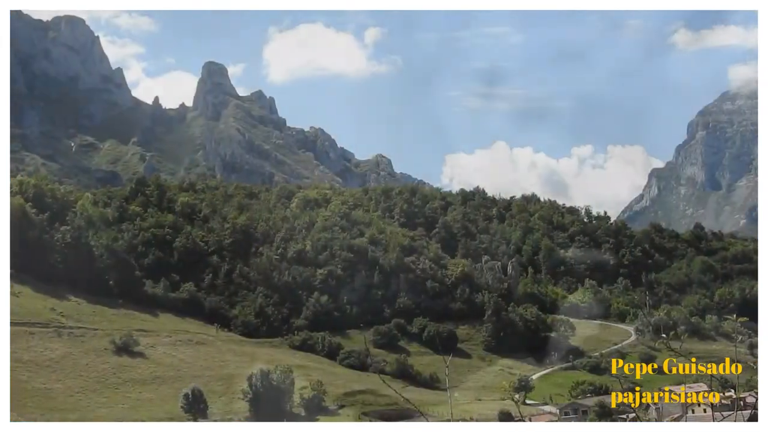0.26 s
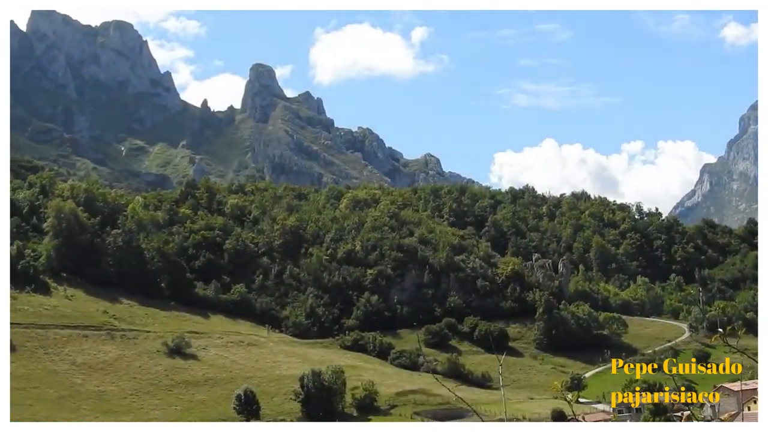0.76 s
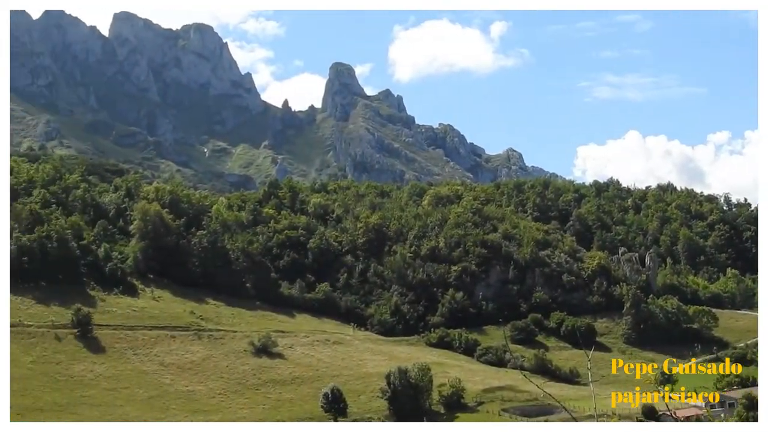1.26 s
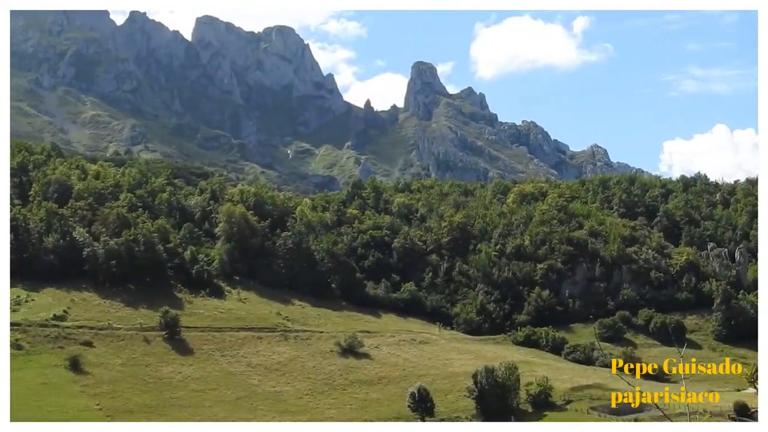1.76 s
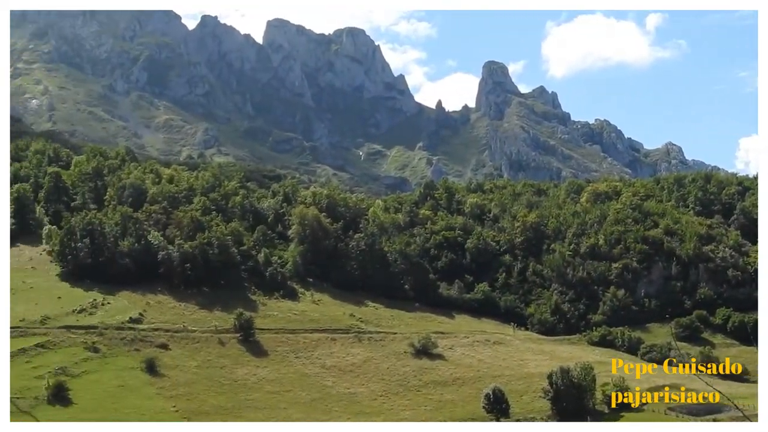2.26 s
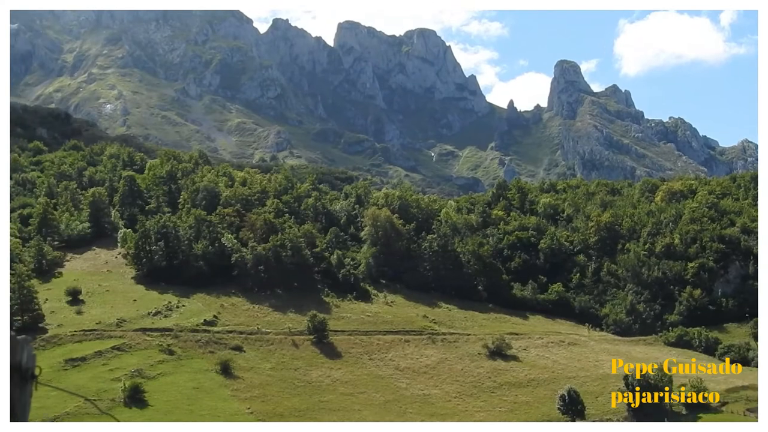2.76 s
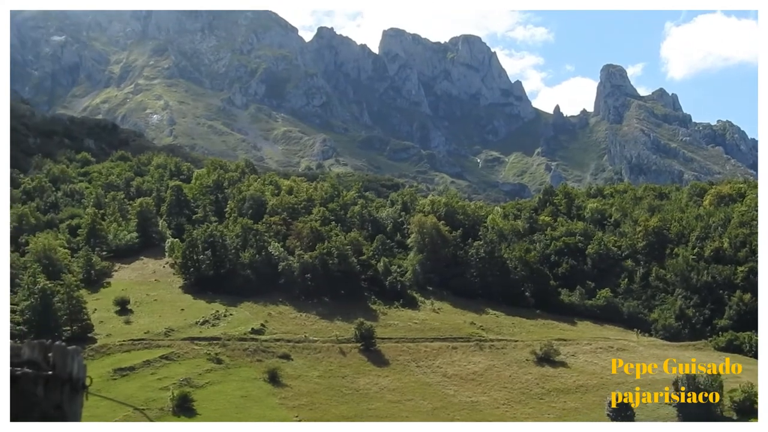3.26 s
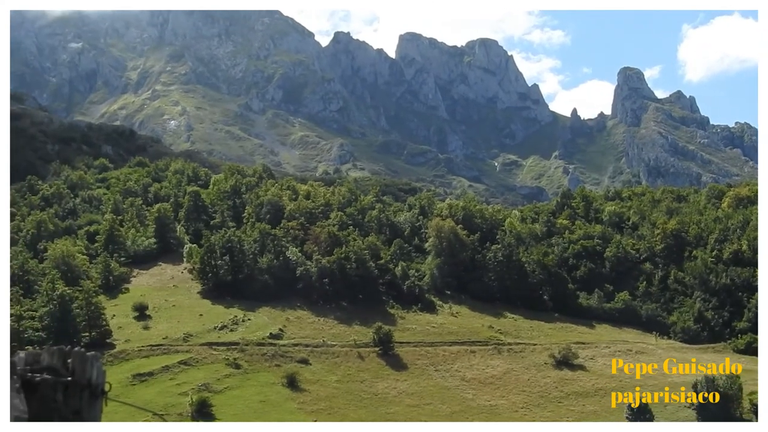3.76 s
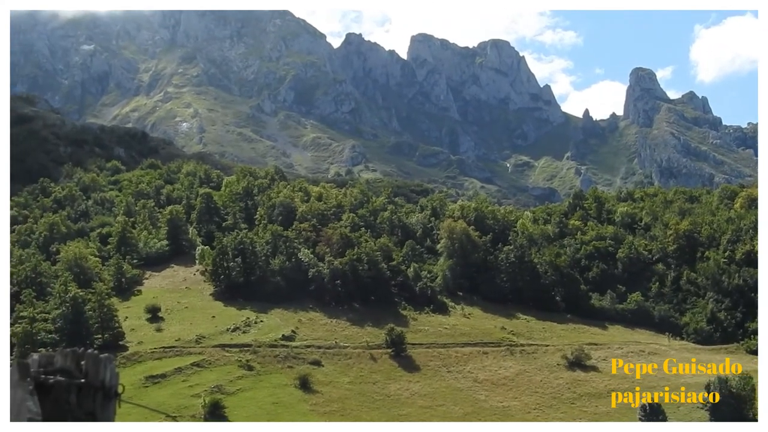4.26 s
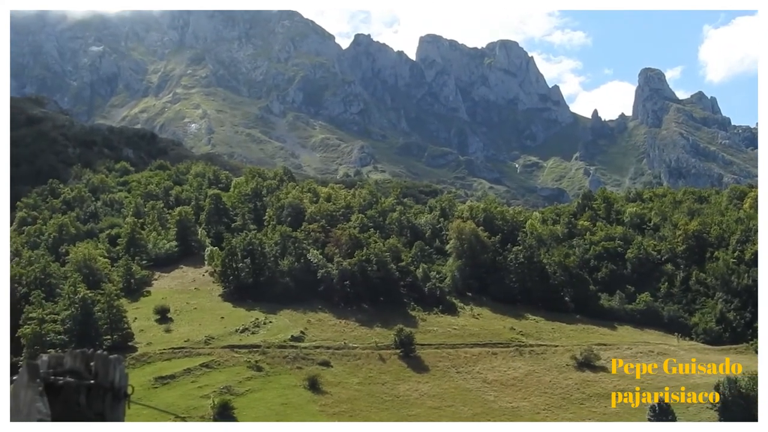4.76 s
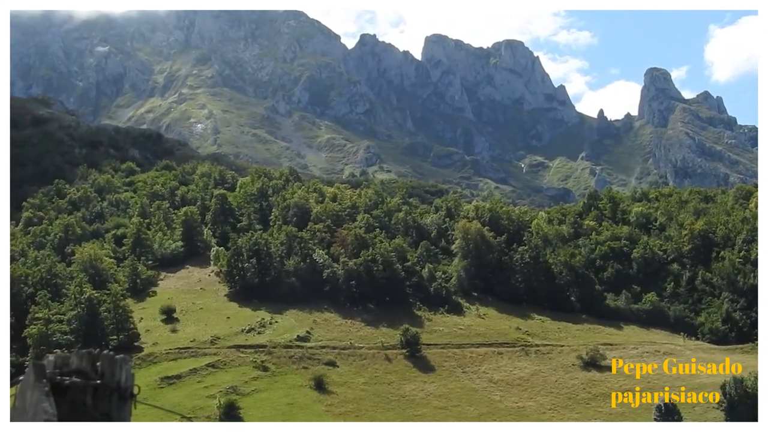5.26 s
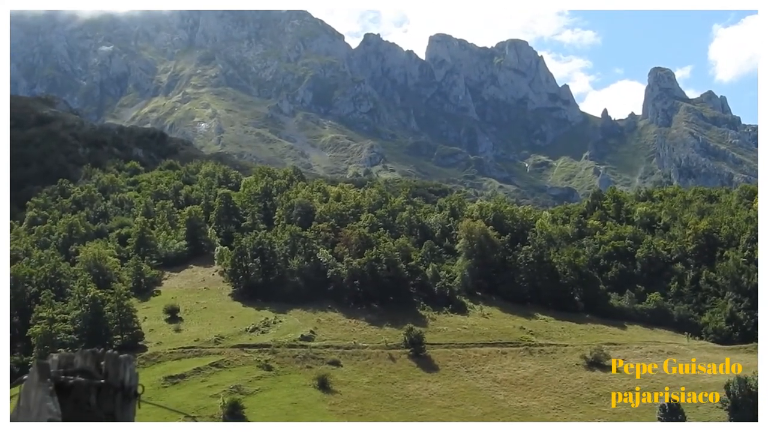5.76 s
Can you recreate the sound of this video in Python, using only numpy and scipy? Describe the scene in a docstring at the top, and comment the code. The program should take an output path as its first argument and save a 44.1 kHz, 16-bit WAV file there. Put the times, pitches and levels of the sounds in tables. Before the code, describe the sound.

A wooded hillside in a gusty breeze, heard in stereo for six seconds. Leaves hush softly with a faint distant rush. From 0.1 to 0.8 s a close small bird gives four short, hoarse rasping calls; from 1.1 to 2.3 s it sings ten sharp chirps, about eight a second, each a noisy rasp snapping into a brief arched tone near 2.5 to 3.5 kHz. Deep wind thumps, flutters and pops strongly around 0.5 to 1 s, shifting between sides, with another gust near 2.1 s. Between 2.4 and 3.9 s come thin falling whistles and hoarse calls from afar, in calmer air. At 3.9 s a dry tick precedes a nuthatch's thirteen gliding, nearly pure whistles around 2.2 kHz, six a second, ringing in scattered tree echoes until 6 s. The background rush drops at 4.1 s, a far bird chorus swells, and gusts return after 4.9 s.

```python
"""A wooded hillside in a gusty breeze. A small bird gives four rasping calls and a run of ten sharp chirps,
made of noisy rasps that lock into arched tones; then a nuthatch whistles a fast trill of gliding, nearly
pure notes that rings in scattered echoes among the trees. Thin slurs and hoarse calls come from farther off.
Shaped noise makes the leaves, a distant rush and the far chorus, and wind that buffets and pops on each
side of the microphone on its own."""
import sys
import numpy as np
from scipy import signal
from scipy.fft import rfft, irfft
from scipy.io import wavfile
from scipy.ndimage import uniform_filter1d

SR = 44100
rng = np.random.default_rng(int(sys.argv[2]) if len(sys.argv) > 2 else 0)


def master(y):
    """Save y as 16-bit WAV."""
    cut = np.clip(np.atleast_2d(y).T, -1, 1)
    pcm = np.round(cut * 32767)  # scale
    wavfile.write(sys.argv[1], SR, pcm.astype(np.int16))


N = 265702
TIME = np.arange(N) / SR

# Small bird's chirps: (tone onset [s], tone length [s], arch height [Hz], rasp swell time [s],
# relative overtone level [dB])
CHIRPS = [(0.071, 0.015, -4, 0.024, -30), (0.305, 0.016, -3, 0.02, -34.5), (0.527, 0.028, 4, 0.021, -19.5),
          (.791, 0.026, 5, 0.017, -26.5), (1.144, 0.035, 63, 0.012, -21.5),
          (1.272, 0.035, 475, 0.0068, -23.5), (1.392, .037, 480, 0.0065, -25),
          (1.516, 0.038, 433, 0.007, -24.5), (1.647, .039, 516, 0.0074, -25),
          (1.773, 0.039, 788, .007, -26), (1.901, 0.04, 789, 0.0078, -27.5),
          (2.028, 0.041, 936, 0.0068, -25.5), (2.167, 0.04, 943, 0.0097, -27.5),
          (2.316, 0.041, 921, 0.0056, -26)]
# What throat and beak pass of the first voice: (frequency [Hz], level [dB])
LOW_BEAK = [(600, -24), (1500, 17), (2000, 6), (2600, 2), (3100, 3), (3700, -18), (4200, -9), (4800, -35)]
# What throat and beak pass of the second voice: (frequency [Hz], level [dB])
HIGH_BEAK = [(3200, -39), (4000, 2.5), (4700, -14.5), (5300, 3), (6100, 1), (6800, 3), (7600, -11.5),
             (8200, -12), (9000, -53)]
# Top end of the small bird's whole voice: (frequency [Hz], level [dB])
BEAK_TOP = [(7800, -0.5), (8600, -11), (10500, -29)]
# Colour of the rasp: (frequency [Hz], level [dB])
RASP = [(500, -11.5), (900, -11.5), (1600, -10), (2700, -9), (3700, 0.5), (4200, -43), (4700, -54)]
CHIRP_HZ, CREST_S, DROOP_S = 2574, 0.0095, 0.054  # pitch crests early, then droops ever faster
ARCH_AT, ARCH_WIDTH = 0.51, 0.21  # an arch lifts the middle as the bird warms up (shares of the tone)
FULL_S, FULL_DB, SHORT_DB_PER_S = 0.04, -24, 488  # tones shorter than full length are weaker
# Tones shorter than HOARSE_S turn hoarse and flat
HOARSE_S, HOARSE_ROUGH, HOARSE_SAG, CLEAR_ROUGH = 0.0305, 0.46, 0.1, 0.13
SECOND_VOICE_LAG_S = 0.0095
RASP_DB, RASP_DB_PER_HZ = -28, -0.0065  # the higher the arch, the less rasp
# A rough buzz inside the rasp climbs toward the tone
SQUEAK_FROM_HZ, SQUEAK_TO_HZ, SQUEAK_DB, SQUEAK_ROUGH = 650, 1904, -4.5, 0.048

# Nuthatch's notes: (onset [s], top pitch [Hz], relative level [dB])
WHISTLES = [(3.934, 2246, -22.5), (4.13, 2284, -22), (4.305, 2289, -21), (4.474, 2261, -21),
            (4.642, 2282, -19), (4.815, 2251, -20.5), (4.99, 2258, -19), (5.15, 2234, -20.5),
            (5.323, 2243, -18.5), (5.484, 2198, -20), (5.647, 2228, -18.5), (5.807, 2218, -19.5),
            (5.966, 2177, -20)]
# Second harmonic of the whistle: (time [s], level [dB])
SECOND_DB = [(3.93, -24), (4.3, -24.5), (4.7, -17.5), (5.05, -21), (5.3, -25), (6.0, -19.5)]
# Breathy edge of a whistle: (frequency [Hz], level [dB])
HUSK = [(1000, -17), (1400, -4), (2400, -21), (3000, 2), (3800, -13.5), (4600, -5), (5500, -41)]
NOTE_S, FIRST_EXTRA_S, SETTLE_S = 0.113, 0.051, 0.22  # first note is drawn out, then the trill settles
RISE_FIRST, RISE_LAST = 0.38, 0.88  # share of a note spent climbing grows through the trill
FACING_DB, TURN_DB_PER_S = 1.5, -2.5  # the bird turns away from the microphone as it sings

SNAP_S, SNAP_DB = 3.931, -22.5  # one sharp tick just before the trill
# Colour of the tick: (frequency [Hz], level [dB])
SNAP = [(2500, -18), (4000, -22), (5200, 0), (7000, -3.5), (9500, -11), (12000, -41)]

# Thin distant whistles: (onset [s], length [s], start pitch [Hz], end pitch [Hz], relative level [dB])
SLURS = [(0.177, .15, 7860, 7300, -52.5), (0.368, .14, 7760, 6760, -52), (0.593, .095, 6940, 6500, -52),
         (2.461, .05, 7270, 6400, -42), (2.585, .079, 7380, 5900, -36.5), (2.733, .07, 6860, 5620, -39),
         (2.758, 0.016, 3870, 5800, -43), (2.791, 0.0165, 3530, 5230, -48),
         (2.873, .083, 6400, 4740, -44.5), (3.674, .065, 7080, 6230, -44), (3.812, .07, 6730, 5860, -45.5),
         (5.479, 0.17, 3110, 3100, -45), (5.648, .18, 3060, 3100, -48.5)]
# Runs of short hoarse distant calls: (start [s], end [s], spacing [s], call length [s], centre [Hz],
# width [Hz], relative level [dB])
FAR_RUNS = [(0.181, .22, .2, 0.018, 6200, 500, -44), (3.291, 3.6, 0.2, .028, 6000, 530, -42),
            (3.62, 3.7, .2, .048, 5430, 1310, -40.5), (3.669, 3.91, 0.049, 0.052, 4700, 1210, -47),
            (4.576, 5.05, .202, 0.037, 5910, 630, -42.5), (5.49, 6.0, 0.2, 0.23, 5820, 420, -49.5)]

# What the trees throw back: (frequency [Hz], level [dB])
ECHO = [(1000, 1.5), (1850, 5), (2100, -2.5), (2270, 3), (2600, -7), (4200, 3.5), (5300, -2.5), (7000, 6),
        (9000, -9)]
# Birds as heard on the left side: (frequency [Hz], level [dB])
SHADE = [(1000, -6.5), (2200, -14), (3000, -12), (3900, -3.5), (5000, -5), (6000, -2), (7500, -4)]
LEFT_LAG_S = 0.000053

# Breeze on the left side: (time [s], relative strength [dB])
BREEZE_LEFT = [(0, -44), (0.44, -44), (0.5, -12.5), (0.72, -10), (0.88, -29), (1.46, -46), (1.76, -45.5),
               (3.99, -48), (4.09, -33), (4.77, -54.5), (4.94, -21), (5.46, -13.5), (5.49, -21),
               (6.02, -26)]
# Breeze on the right side: (time [s], relative strength [dB])
BREEZE_RIGHT = [(0, -28), (.42, -45), (.52, -23), (.95, -13), (1.2, -17), (1.51, -21), (2.06, -26),
                (2.21, -14), (2.26, -20.5), (2.78, -27), (2.81, -37), (3.29, -42), (3.619, -30.5),
                (3.95, -37.5), (4.06, -22.5), (4.77, -24), (5.12, -21), (6.02, -18)]
# Single gusts on top: (peak time [s], length [s], relative strength [dB], left minus right [dB])
GUSTS = [(0.181, 0.06, -13, -13), (0.207, 0.16, -16.5, 29), (0.608, 0.18, -12, -23),
         (0.822, 0.11, -13, -26), (1.398, 0.15, -16, -8), (2.13, 0.093, -13.5, -16),
         (3.056, 0.051, -28, -29), (3.172, 0.043, -27, -27), (3.559, 0.049, -17, -29),
         (4.041, 0.097, -14, -22.5), (4.48, 0.14, -20.5, -4), (4.582, 0.033, -19, 16),
         (4.959, 0.059, -12.5, 22.5), (5.2, 0.12, -11, -7.5), (5.373, 0.17, -14, -7.5),
         (5.823, 0.097, -15, 19), (5.923, 0.032, -13, 21)]
BREEZE_DB, GUST_DB = -0.5, -0.5  # trims on the tables above
SWING_DB, SWING_HZ = 2, 36  # depth and rate of the breeze's chance swings
# Main eddies on the microphone: (frequency [Hz], level [dB])
WIND = [(15, -35.5), (30, -26), (50, -9.5), (70, 2), (115, 5), (150, -6), (200, -11), (260, -41),
        (400, -57.5), (900, -55), (3000, -100)]
# Slow, large eddies: (frequency [Hz], level [dB])
RUMBLE = [(15, -22.5), (35, -9), (70, 3.5), (110, -0.5), (160, -13.5), (240, -33), (500, -67)]
RUMBLE_DB = -51.5
# Thump of stronger wind: (frequency [Hz], level [dB])
BUFFET = [(90, -22.5), (160, 5.5), (210, -1), (280, -19), (380, -28.5), (700, -58), (2000, -100)]
# Flutter of the strongest gusts: (frequency [Hz], level [dB])
FLUTTER = [(120, -12), (250, 8), (500, -12.5), (1000, -16), (2500, -24), (7000, -71), (14000, -77.5)]

# Pops of hard gusts on the microphone: (time [s], relative level [dB], left minus right [dB])
POPS = [(0.553, -20.5, 33), (0.614, -24, -9), (.641, -24.5, 19), (.687, -21.5, 10), (0.714, -21.5, 34),
        (.805, -18.5, -23), (.976, -26, -25), (1.134, -22, -31), (2.145, -23, -20), (5.162, -21.5, -21),
        (5.198, -25.5, -21), (5.209, -30.5, -7), (5.362, -29.5, 1), (5.428, -23, -4), (5.655, -32, -14),
        (5.915, -28.5, 17)]
# Colour of a pop: (frequency [Hz], level [dB])
POP = [(60, -7.5), (150, 12.5), (400, -3), (1000, -19), (2500, -31.5), (6000, -41), (15000, -54.5)]
# Lesser pops come by chance, this often at wind strength CRACKLE_WIND_DB
CRACKLE_PER_S, CRACKLE_DB, CRACKLE_WIND_DB = 45, -41.5, -12.5

# Leaves, colour: (frequency [Hz], level [dB])
AIR = [(40, 9), (120, 1.5), (300, -6.5), (900, -11.5), (1900, -10), (3500, -13.5), (6900, -12),
       (8400, -20.5), (12000, -27.5), (15500, -38)]
# Leaves, loudness: (time [s], level [dB])
AIR_DB = [(0, -48.5), (4.08, -48.5), (4.12, -54), (6.02, -54)]
# Left-right likeness of the background: (frequency [Hz], likeness [0-1])
AIR_SAME = [(100, 0.94), (500, 0.65), (1200, 0.69), (2200, 0.48), (4000, 0.25), (9000, 0.07)]
# Low distant rush, as of a stream, colour: (frequency [Hz], level [dB])
MURMUR = [(150, -11.5), (300, -2.5), (520, 2.5), (800, -3), (1300, -5), (1800, -18), (3000, -46)]
# Distant rush, loudness: (time [s], level [dB])
MURMUR_DB = [(0, -52), (3.0, -51.5), (4.08, -50.5), (4.12, -62), (6.02, -58.5)]
# Far chorus of birds, colour: (frequency [Hz], level [dB])
CHORUS = [(600, -67.5), (1100, -1.5), (1450, 5), (1800, -20), (2500, 3), (3100, 5.5), (4300, 2.5),
          (5000, -1.5), (5900, -4.5), (6700, -10.5), (7400, -32), (9000, -66.5)]
# Far chorus swelling behind the trill: (time [s], level [dB])
CHORUS_DB = [(0, -70), (3.9, -58.5), (4.2, -51), (5.1, -45.5), (5.4, -44.5), (5.8, -44), (6.02, -42.5)]
EDGE_HZ = 15800  # top of the audible band


def chirps(third_db=-2, jitter=0.19, flutter=0.28, fade_db=11, break_hz=3120, break_rough=0.35, break_db=8):
    """Arched tones of one voice, with a second voice trailing it, heard by its overtones."""
    out = np.zeros(N)
    for s, length, arch_hz, _, high_db in CHIRPS:
        size = int(length * SR)
        u = np.linspace(0, 1, size)
        hoarse = np.clip(2 * (1 - length / HOARSE_S), 0, 1)
        droop = ((u * length - CREST_S) / DROOP_S) ** 2 + HOARSE_SAG * hoarse
        pitch = CHIRP_HZ * (1 - droop) + arch_hz * np.exp(-((u - ARCH_AT) / ARCH_WIDTH) ** 2)
        low_db = FULL_DB - SHORT_DB_PER_S * (FULL_S - length)

        # Unsteady as it sets in, cracking where the arch passes its highest register
        crack = np.exp(-((pitch - break_hz) / 70) ** 2)
        unsteady = CLEAR_ROUGH + HOARSE_ROUGH * hoarse + 0.22 * np.exp(-u / 0.17) + break_rough * crack
        low_hz, high_hz = (pitch * (1 + jitter * unsteady * wobble(840, size)) for _ in range(2))
        fade = amp(-fade_db * np.maximum(2 * u - 1, 0) ** 0.8)
        pressure = np.sqrt(2) * signal.windows.tukey(size, 0.14) * fade
        low_gain, high_gain = (pressure * (1 + flutter * unsteady * wobble(680, size)) for _ in range(2))

        add(out, s, amp(low_db + read(LOW_BEAK, low_hz)) * low_gain * np.sin(turning(low_hz)))
        second = amp(read(HIGH_BEAK, 2 * high_hz)) * np.sin(2 * turning(high_hz))
        second *= np.minimum(u / 0.074, 1)
        third_hz = 3 * high_hz
        third = amp(third_db + read(HIGH_BEAK, third_hz)) * np.sin(turning(third_hz))
        overtone_gain = amp(high_db - break_db * crack) * high_gain
        add(out, s + SECOND_VOICE_LAG_S, overtone_gain * (second + third))
    return out


def rasps(high_rasp_db=-2, depth=0.29):
    """Noise and buzz swell in uneven puffs before each chirp, then die as the tone takes over."""
    out = np.zeros(N)
    for s, _, arch_hz, rasp_s, _ in CHIRPS:
        t = np.arange(-2 * rasp_s, 0.012, 1 / SR)
        size = len(t)
        envelope = np.where(t < 0, np.exp(-(t / rasp_s) ** 2), np.exp(-t / 0.0035))
        puffs = unit(1 + np.tanh(depth * wobble(675, size)))
        swell = amp(RASP_DB + RASP_DB_PER_HZ * arch_hz) * envelope * puffs
        add(out, s + t[0], swell * (noise(RASP, size) + amp(SQUEAK_DB) * squeak(size)))
        # Long rasps are brighter
        bright = amp(high_rasp_db + 3.0 * np.log2(rasp_s / 0.0035)) * np.exp(np.minimum(t, 0) / 0.033)
        add(out, s + t[0] + SECOND_VOICE_LAG_S, bright * swell * noise(HIGH_BEAK, size))
    return out


def squeak(size):
    """A rough stack of five harmonics glides upward, coloured like the rasp."""
    hz = np.linspace(SQUEAK_FROM_HZ, SQUEAK_TO_HZ, size) * (1 + SQUEAK_ROUGH * wobble(600, size))
    return unit(sum(amp(read(RASP, k * hz)) * np.sin(k * turning(hz)) for k in range(1, 6)))


def whistles(scoop=0.16, drop=0.24, fall_from=0.78, lean=0.041, drift=0.0045,
             third_db=-40, edge_db=-12, onset_db=-20, waver_db=2, weaken_db=4):
    """Nearly pure notes scoop up, hold and fall; returns sound toward the microphone and into the trees."""
    direct, around = np.zeros((2, N))
    first_s, last_s = WHISTLES[0][0], WHISTLES[-1][0]
    for s, top_hz, db in WHISTLES:
        sung_s = s - first_s
        size = int((NOTE_S + FIRST_EXTRA_S * np.exp(-sung_s / SETTLE_S)) * SR)
        u = np.linspace(0, 1, size)

        rise = RISE_FIRST + (RISE_LAST - RISE_FIRST) * np.sqrt(sung_s / (last_s - first_s))
        climb = scoop * np.maximum(1 - u / rise, 0) ** 2.9
        climb += lean * (rise - RISE_FIRST) * np.maximum(1 - u / fall_from, 0)
        sag = climb + drop * np.maximum((u - fall_from) / (1 - fall_from), 0) ** 1.35
        unsteady = 0.002 * wobble(110, size) + drift * wobble(25.6, size)
        phase = turning(top_hz * (1 - sag + unsteady))

        # Overtones come with the full pressure in the middle of the note
        second_db = np.interp(s, *np.transpose(SECOND_DB))
        overtones = amp(second_db) * np.sin(2 * phase) + amp(third_db) * np.sin(3 * phase)
        overtones *= np.sin(np.pi * u)
        tone_gain = np.sqrt(2) * amp(edge_db * sag / scoop + waver_db * wobble(49, size))
        tone = tone_gain * (np.sin(phase) + overtones)
        husk = amp(onset_db) * np.exp(-u / 0.23) * noise(HUSK, size)

        # Notes weaken from start to end, the more so when they climb quickly
        swell = amp(db + weaken_db * (rise - 1.13) * (2 * u - 1.5))
        note = swell * signal.windows.tukey(size, 0.16) * (tone + husk)
        add(direct, s, amp(FACING_DB + TURN_DB_PER_S * sung_s) * note)
        add(around, s, note)
    return direct, around


def snap(decay_s=0.0053):
    """One dry, bright tick of decaying noise."""
    out, t = np.zeros(N), np.arange(1024) / SR
    add(out, SNAP_S, amp(SNAP_DB) * np.exp(-t / decay_s) * noise(SNAP, len(t)))
    return out


def far_birds():
    """Thin whistles glide in pitch; short hoarse calls are tones roughened by fast chance swings."""
    out = np.zeros(N)
    for s, length, start_hz, end_hz, db in SLURS:
        size = int(length * SR)
        hz = np.linspace(start_hz, end_hz, size) * (1 + 0.0061 * wobble(200, size))
        add(out, s, amp(db) * np.sqrt(2) * signal.windows.tukey(size, 0.6) * np.sin(turning(hz)))
    for start, end, spacing, length, hz, width_hz, db in FAR_RUNS:
        size = int(length * SR)
        for s in np.arange(start, end, spacing):
            call = unit(wobble(width_hz, size) * np.sin(turning(np.full(size, hz))))
            add(out, s, amp(db) * signal.windows.tukey(size, 0.7) * call)
    return out


def forest(direct, around, wet_db, t60, spread, first_s, edge_s, edge_db):
    """Trunks scatter echoes, with a cluster from the forest edge; the left side is later and shaded."""
    t = np.arange(SR) / SR
    taps = rng.standard_normal((2, SR)) * (rng.random((2, SR)) < 1500 / SR)  # about 1500 echoes a second
    cluster = 1 + amp(edge_db) * np.exp(-((t - edge_s) / 0.0019) ** 2)
    taps *= amp(-60 * t / t60) * np.clip(t / first_s - 0.5, 0, 1) * cluster
    thrown = colour(around, ECHO)
    shared, apart = (amp(wet_db) * signal.fftconvolve(thrown, k / np.linalg.norm(k))[:N] for k in taps)

    hz = np.fft.rfftfreq(N, 1 / SR)
    shade = amp(read(SHADE, hz)) * np.exp(-2j * np.pi * hz * LEFT_LAG_S)
    left = irfft(rfft(direct + shared + spread * apart) * shade, N)
    return np.array([left, direct + shared])


def wind_force():
    """Strength of the wind on each side: the breeze with its chance swings, plus bell-shaped gusts."""
    power = np.zeros((2, N))
    for side, breeze in enumerate((BREEZE_LEFT, BREEZE_RIGHT)):
        power[side] = (level(breeze) * amp(BREEZE_DB + SWING_DB * wobble(SWING_HZ, N))) ** 2
    for s, length, db, pan_db in GUSTS:
        bell = amp(GUST_DB + db) * np.exp(-(2 * (TIME - s) / length) ** 2)
        power += np.outer(sides(pan_db), bell) ** 2
    return np.sqrt(power)


def wind(force, buffet_db=-6.5, buffet_growth=2.12, flutter_db=-22, flutter_growth=4.5,
         strong_db=-13, quicken=0.25):
    """Eddies thump on one side: slow in light air, smaller as it strengthens; the strongest gusts flutter."""
    eddies, slow = evened(noise(WIND, N)), evened(noise(RUMBLE, N))
    strength = np.minimum(force / amp(strong_db), 1)
    brisk = strength ** quicken
    thump = force * (brisk * eddies + np.sqrt(1 - brisk ** 2) * slow)
    buffet = amp(buffet_db + strong_db) * strength ** buffet_growth * noise(BUFFET, N)
    flutter = amp(flutter_db + strong_db) * strength ** flutter_growth * abs(eddies) * noise(FLUTTER, N)
    return thump + buffet + flutter + amp(RUMBLE_DB) * noise(RUMBLE, N)


def evened(x):
    """Divides by the running loudness to even out chance peaks and lulls."""
    return unit(x / np.sqrt(uniform_filter1d(x ** 2, size=1500) + 0.11))


def pops(force, pop_db=8.5):
    """Brief overloads: a sharp edge with a low push behind it; lesser ones crackle in strong wind."""
    size = 2048
    log_gain = np.log(amp(read(POP, abs(np.fft.fftfreq(size, 1 / SR)))))
    # Minimum phase puts the energy right at the onset
    pulse = np.fft.ifft(np.exp(np.conj(signal.hilbert(log_gain)))).real
    pulse /= abs(pulse).max()
    chance = CRACKLE_PER_S / SR * (force / amp(CRACKLE_WIND_DB)) ** 2
    kicks = amp(CRACKLE_DB) * rng.standard_normal((2, N)) * (rng.random((2, N)) < chance)
    for s, db, pan_db in POPS:
        kicks[:, round(s * SR)] += amp(db) * np.sqrt(2) * sides(pan_db) * rng.choice([-1, 1])
    return amp(pop_db) * signal.oaconvolve(kicks, pulse[None], axes=1)[:, :N]


def air():
    """Shaped noise: a soft hush of leaves, a distant rush, and the blur of many far birds."""
    leaves = pair(AIR) * level(AIR_DB)
    rush = patchy(pair(MURMUR), depth_db=2) * level(MURMUR_DB)
    chorus = patchy(pair(CHORUS), depth_db=5) * level(CHORUS_DB) * amp([[-2], [0]])  # softer on the left
    return leaves + rush + chorus


def pair(points):
    """Noise of a given spectrum on both sides, partly alike."""
    same = np.clip(read(AIR_SAME, np.fft.rfftfreq(N, 1 / SR)), 0, 1)
    a, b = noise(points, N), noise(points, N)
    return np.array([a, irfft(same * rfft(a) + np.sqrt(1 - same ** 2) * rfft(b), N)])


def patchy(x, depth_db):
    """Lets narrow bands swell and fade by chance."""
    z = signal.stft(x, nperseg=1024, noverlap=768)[2]
    patches = uniform_filter1d(rng.standard_normal(z.shape[1:]), size=6, axis=0)  # across frequency
    patches = unit(uniform_filter1d(patches, size=16, axis=1))  # across time
    return unit(signal.istft(z * amp(depth_db * patches), nperseg=1024, noverlap=768)[1][:, :N])


def amp(db):
    """Decibels to gain."""
    return 10 ** (np.asarray(db) / 20)


def unit(x):
    """Scales to an rms of one."""
    return x / np.sqrt(np.mean(x ** 2) + 1e-20)


def read(points, hz):
    """Reads a spectrum table on a log-frequency axis."""
    f, value = np.transpose(points)
    return np.interp(np.log(hz + 1), np.log(f + 1), value)


def level(points):
    """A table of (time [s], level [dB]) as a gain for every sample."""
    return amp(np.interp(TIME, *np.transpose(points)))


def colour(x, points):
    """Filters by a spectrum table."""
    size = x.shape[-1]
    return irfft(rfft(x) * amp(read(points, np.fft.rfftfreq(size, 1 / SR))), size)


def noise(points, size):
    """Noise of a given spectrum, at an rms of one."""
    return unit(colour(rng.standard_normal(size), points))


def wobble(hz, size):
    """Smooth chance swings up to about a given rate."""
    f = np.fft.rfftfreq(size, 1 / SR)
    return unit(irfft(rfft(rng.standard_normal(size)) * np.exp(-(f / hz) ** 2), size))


def turning(hz):
    """Phase of a tone that follows a pitch curve."""
    return 2 * np.pi * np.cumsum(hz) / SR


def sides(pan_db):
    """Left and right gains of total power one."""
    return unit(amp([pan_db / 2, -pan_db / 2])) / np.sqrt(2)


def add(mix, s, sound):
    """Mixes a sound in at a time in seconds."""
    part = mix[max(round(s * SR), 0):][:len(sound)]
    part += sound[:len(part)]


def scene():
    """Birds among the trees, with wind on the microphone."""
    near = colour(chirps() + rasps(), BEAK_TOP) + snap()
    far = far_birds()
    # Times in seconds
    birds = forest(near, near, wet_db=-15.5, t60=0.23, spread=0.95, first_s=0.0059, edge_s=0.042, edge_db=-1.5)
    birds += forest(*whistles(), wet_db=-6.0, t60=1.0, spread=0.37, first_s=0.0017, edge_s=0.0664, edge_db=-1)
    birds += forest(far, far, wet_db=-12.0, t60=0.52, spread=0.46, first_s=0.0084, edge_s=0.045, edge_db=-7.0)
    force = wind_force()
    gusty = np.array([wind(side) for side in force])
    return birds + gusty + pops(force) + air()


def record(dry):
    """The hardest gusts saturate softly; the sound fades in and out; then the treble is band-limited."""
    held = dry / (1 + (dry / 0.88) ** 6) ** (1 / 6)
    faded = held * signal.windows.tukey(N, 0.004)
    lowpass = signal.firwin(511, EDGE_HZ, window=("kaiser", 9), fs=SR)
    return signal.oaconvolve(faded, lowpass[None], "same", axes=1)


dry = scene()
out = record(dry)
master(out)
```